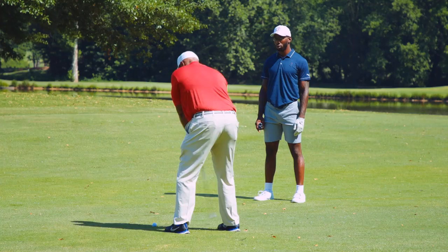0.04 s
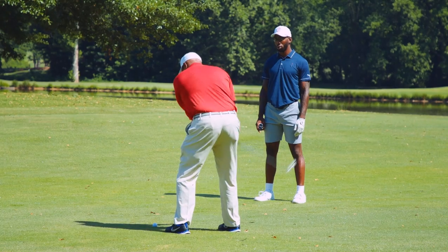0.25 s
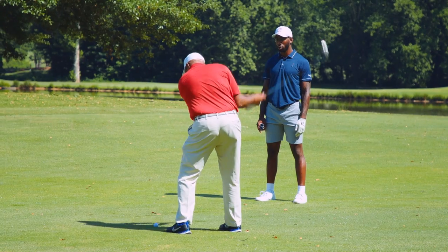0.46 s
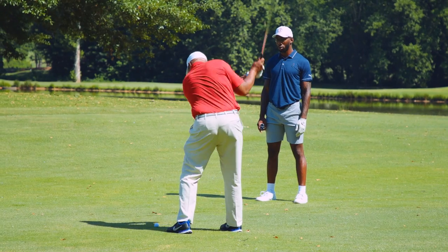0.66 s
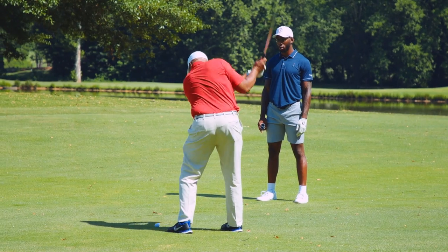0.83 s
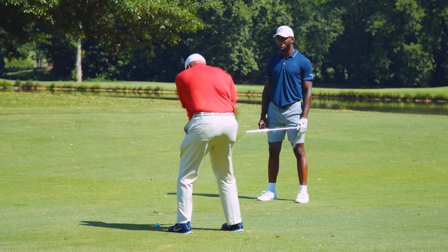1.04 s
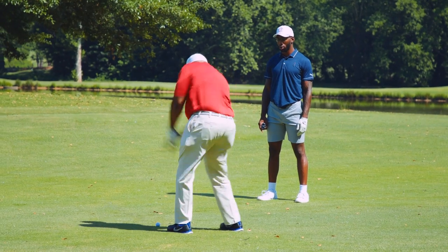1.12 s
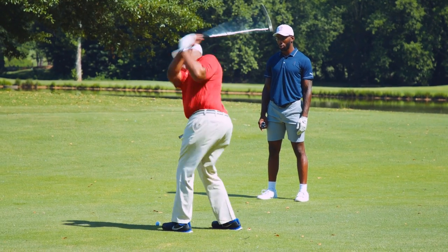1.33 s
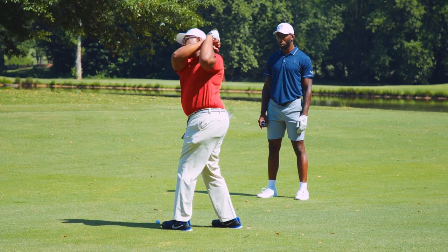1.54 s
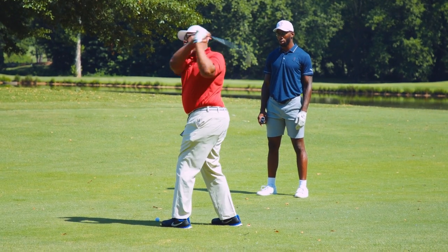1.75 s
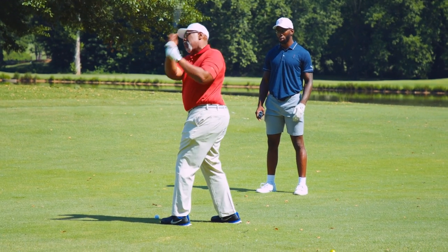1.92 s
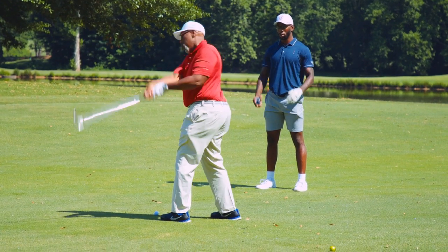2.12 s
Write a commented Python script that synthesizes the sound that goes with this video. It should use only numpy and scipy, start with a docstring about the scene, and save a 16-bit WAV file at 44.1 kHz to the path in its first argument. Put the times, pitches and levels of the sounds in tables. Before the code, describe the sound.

A golfer's swing on a quiet fairway, heard through a small microphone on the shirt: faint air and thin bird whistles, then a sudden cloth swish with heavy thumps, ending in crisp crackles and ticks.

```python
"""A quiet fairway: a golfer wearing a small microphone on his shirt swings a club. Over a soft hiss of shaped
noise glide thin whistles (birds, at a guess) and one lower squeak of the cloth, breathy sines with echoes.
The cloth drags over the capsule: noise and uneven clicks, filtered into bands, give rumble, a grainy swish
and a crisp crackle as the arms come down again. Dry ticks are short noisy snaps; jolts are brief low swings,
two of them with a low knock."""
import sys
import numpy as np
from scipy import signal
from scipy.fft import rfft, irfft
from scipy.io import wavfile
from scipy.ndimage import uniform_filter1d

SR = 44100
rng = np.random.default_rng(int(sys.argv[2]) if len(sys.argv) > 2 else 0)


def master(y):
    """Save y as 16-bit WAV."""
    cut = np.clip(np.atleast_2d(y).T, -1, 1)
    pcm = np.round(cut * 32767)  # scale
    wavfile.write(sys.argv[1], SR, pcm.astype(np.int16))


def linear_from_db(decibels):
    """Turn decibels (scalar or array-like) into linear amplitude factors; 0 gives 1."""
    return 10 ** (np.asarray(decibels, float) / 20)


N = 96314  # samples, about 2.2 s


def colour(x, points):
    """Shape the spectrum of x by (pitch_hz, level_db) points, straight over log frequency; rms 1."""
    hz, db = np.array(points, float).T
    bins_hz = np.fft.rfftfreq(N, 1 / SR) + 1  # the extra 1 Hz avoids log(0)
    gain_db = np.interp(np.log(bins_hz), np.log(hz), db, -120, -120)
    y = irfft(rfft(x) * linear_from_db(gain_db), N)
    return y / np.sqrt(np.mean(y ** 2))


def walk(rate_hz):
    """Random levels held for 1 / rate_hz seconds and slewed twice; spread near 1."""
    hold = int(SR / rate_hz)
    steps = np.repeat(rng.standard_normal(N // hold + 1), hold)
    smooth = uniform_filter1d(uniform_filter1d(steps, hold), hold)
    return 1.09 * smooth[:N]


def grains(per_s, spread_db, hiss_db):
    """Fibres slip past each other: signed clicks of very uneven size over a fine hiss."""
    hit = rng.random(N) < per_s / SR
    size = linear_from_db(spread_db * np.minimum(rng.exponential(size=N), 5))
    clicks = hit * np.sign(rng.standard_normal(N)) * size
    clicks /= np.sqrt(np.mean(clicks ** 2))
    return clicks + linear_from_db(hiss_db) * rng.standard_normal(N)  # hiss_db is relative to the clicks


def curve_gain(table, column):
    """Gain over time from one dB column, with time_s in column 0."""
    c = np.array(table, float)
    return linear_from_db(np.interp(np.arange(N) / SR, c[:, 0], c[:, column]))


def add(out, start_s, x):
    """Mix x into out from start_s on."""
    i = int(start_s * SR)
    out[i:i + len(x)] += x[:N - i]


# Spectrum of the open air: pitch_hz, level_db (per Hz, relative)
AIR_SPECTRUM = [(15, -21), (30, -6), (55, 4.5), (100, 1.5), (160, -2), (250, -8), (500, -9.5), (800, -15),
                (1300, -23.5), (2200, -24), (4000, -21.5), (6000, -28.5), (8000, -42.5), (12700, -53),
                (13300, -70)]


def air():
    """Distant outdoor hiss and hum: shaped noise whose level drifts slowly around -58.5 dB."""
    level_db = -58.5 + 1.4 * walk(4.9)
    return linear_from_db(level_db) * colour(rng.standard_normal(N), AIR_SPECTRUM)


# Spectra of the capsule's rumble and of the low rub: pitch_hz, level_db (per Hz, relative)
RUMBLE_SPECTRUM = [(15, -15.5), (30, -2), (50, 5), (80, -1), (140, -6.5), (200, -14.5), (300, -34.5)]
RUB_SPECTRUM = [(120, -6.5), (200, 0), (300, -1), (500, -5), (800, -10.5), (1200, -29.5)]
# Capsule shaken by the cloth, levels before flutter: time_s, rumble_db, rub_db
SHAKE_LEVELS = [(0, -72, -73), (.25, -59.5, -72), (.33, -54.5, -76), (.42, -56, -67), (.7, -56, -72),
                (.85, -56.5, -67), (1.0, -52.5, -72), (1.11, -51.5, -70), (1.14, -35.5, -58),
                (1.205, -30.5, -37), (1.26, -26.5, -44), (1.31, -26.5, -31.5), (1.35, -19.5, -31.5),
                (1.375, -18, -43), (1.41, -19, -43), (1.44, -33, -35.5), (1.47, -34.5, -37.5),
                (1.5, -28.5, -43), (1.6, -36.5, -41), (1.66, -46, -52), (1.75, -44, -51), (1.84, -41, -47),
                (1.86, -38.5, -39), (1.93, -39.5, -41.5), (1.97, -46.5, -50.5), (2.18, -47, -51.5)]


def shaken_capsule(catch):
    """The cloth shakes the capsule: low noise for the rumble, sparse grains for the rub above it."""
    rumble = colour(rng.standard_normal(N), RUMBLE_SPECTRUM) * linear_from_db(0.94 * walk(25.16))
    rub = colour(grains(500, 2.1, hiss_db=6.0), RUB_SPECTRUM) * linear_from_db(1.6 * catch + 1.6 * walk(29.98))
    return curve_gain(SHAKE_LEVELS, 1) * rumble + curve_gain(SHAKE_LEVELS, 2) * rub


# Spectra of the swish, its upper part and the crisp crackle: pitch_hz, level_db (per Hz, relative)
SWISH_SPECTRUM = [(500, 2), (800, 3), (1500, 2.5), (3000, -0.5), (5000, -7), (6500, -28)]
UPPER_SPECTRUM = [(3800, -11.5), (5000, -3), (6500, 0), (8000, -11), (9500, -20.5), (11000, -27),
                  (13000, -40)]
CRISP_SPECTRUM = [(7000, 4.5), (9000, 4), (12000, 2), (15500, -4.5), (17000, -39.5)]
# Cloth sliding, levels before flutter: time_s, swish_db, upper_swish_db, crisp_crackle_db
SLIDE_LEVELS = [(0, -74, -83, -100), (.09, -92, -84, -100), (.3, -70, -78, -100), (.44, -70.5, -75.5, -100),
                (.47, -66, -70, -96), (.56, -68, -74, -99), (.64, -71, -71.5, -94), (.675, -68, -68, -92),
                (.72, -71, -77, -96), (.9, -73.5, -78.5, -100), (1.08, -67.5, -76.5, -96),
                (1.13, -63.5, -70.5, -100), (1.18, -51.5, -60.5, -100), (1.23, -48.5, -59.5, -99),
                (1.265, -44, -54.5, -97), (1.3, -44.5, -52, -99), (1.318, -35, -44.5, -93.5),
                (1.338, -43.5, -53.5, -97), (1.355, -37.5, -52, -95.5), (1.378, -42, -50, -92),
                (1.408, -39.5, -51.5, -90), (1.45, -40.5, -53.5, -81), (1.51, -45.5, -54, -79),
                (1.57, -44.5, -69, -73.5), (1.6, -41, -69, -68.5), (1.66, -57, -79, -79),
                (1.69, -52, -72, -73), (1.8, -53.5, -73.5, -70), (1.91, -47.5, -64, -63.5),
                (1.96, -51.5, -62.5, -63), (2.0, -52.5, -64.5, -65.5), (2.06, -56, -64.5, -66.5),
                (2.18, -57.5, -67, -70.5)]


def sliding_cloth(catch):
    """Dense fibre slips feed both swish bands; a sparser set of clicks makes the crackle."""
    fibres = grains(6000, 3.75, hiss_db=-1.5)
    swish = colour(fibres, SWISH_SPECTRUM) * linear_from_db(0.69 * catch + 0.53 * walk(59.3))
    upper = colour(fibres, UPPER_SPECTRUM) * linear_from_db(1.0 * catch + 0.71 * walk(59.6))
    crisp = colour(grains(440, 3.0, hiss_db=6.5), CRISP_SPECTRUM) * linear_from_db(0.8 * catch)
    out = curve_gain(SLIDE_LEVELS, 1) * swish
    out += curve_gain(SLIDE_LEVELS, 2) * upper
    return out + curve_gain(SLIDE_LEVELS, 3) * crisp


def cloth():
    """The dragging shirt: catches in the weave flutter every band above the rumble together."""
    catch = walk(45.07)
    return shaken_capsule(catch) + sliding_cloth(catch)


# Thin whistles (birds, at a guess) and one lower squeak of the cloth at 1.41 s:
# start_s, length_s, first_pitch_hz, last_pitch_hz, level_db (sine peak), breathiness (0-1)
WHISTLES_AND_SQUEAK = [(.012, .011, 2800, 3600, -64.5, .3), (.031, .011, 2850, 3800, -65, .3),
                       (.05, .01, 2850, 3500, -65.5, .3), (.082, .1, 4600, 3780, -69.5, .55),
                       (.105, .075, 3880, 3780, -74, .6), (.18, .075, 3770, 3680, -68.5, .4),
                       (.29, .31, 3740, 3640, -72.5, .6), (.587, .028, 2700, 2800, -68, .5),
                       (.636, .028, 3230, 2950, -65, .55), (.652, .028, 2560, 2400, -67.5, .55),
                       (.742, .045, 2280, 2340, -71.5, .3), (.795, .08, 2340, 2310, -71.5, .45),
                       (1.088, .082, 3500, 2960, -56.5, .15), (1.112, .06, 4020, 3800, -60, .2),
                       (1.172, .034, 3780, 3660, -56.5, .2), (1.18, .034, 3400, 2650, -58, .3),
                       (1.212, .034, 3660, 3600, -55.5, .3), (1.253, .05, 3570, 3480, -53, .4),
                       (1.407, .013, 1250, 1520, -39, .6), (1.418, .016, 1560, 1260, -41, .6),
                       (1.56, .04, 2380, 2200, -55, .4), (1.78, .022, 2950, 2670, -54, .5),
                       (1.805, .029, 2550, 2450, -57, .5), (2.07, .048, 6350, 5460, -61.5, .2)]


def whistles_and_squeak():
    """Slightly unsteady gliding sines; breath breaks them up into a narrow band of noise."""
    out, waver = np.zeros(N), walk(250)
    breath = walk(400) + 1j * walk(400)
    for start_s, length_s, first_hz, last_hz, level_db, breathy in WHISTLES_AND_SQUEAK:
        u = np.linspace(0, 1, int(length_s * SR))
        i = int(start_s * SR)
        span = slice(i, i + len(u))
        hz = (first_hz + (last_hz - first_hz) * u) * (1 + 0.004 * waver[span])
        carrier = np.exp(2j * np.pi * np.cumsum(hz) / SR)
        tone = (np.sqrt(1 - breathy ** 2) + breathy * breath[span]) * carrier
        swell = np.abs(np.sin(np.pi * u)) ** 0.31
        add(out, start_s, linear_from_db(level_db) * swell * tone.imag)
    return out


def echoes(tones):
    """Scattered echoes roughen and prolong the whistles and the cloth squeak."""
    t60_s, echo_db = 0.22, -8
    t = np.arange(SR // 3) / SR
    tail = rng.standard_normal(len(t)) * linear_from_db(-60 * t / t60_s)
    tail /= np.sqrt(np.sum(tail ** 2))
    return tones + linear_from_db(echo_db) * signal.fftconvolve(tones, tail)[:N]


# Dry ticks, and two low knocks that go with the jolts at 1.30 and 1.35 s:
# start_s, level_db (peak), centre_hz, width_hz (band at half height), ring_ms (tail down 17 dB)
TICKS_AND_KNOCKS = [(0.68, -45.5, 6340, 8000, 2.8), (1.2198, -33.5, 7070, 3500, 2.2),
                    (1.22, -30.5, 3200, 2600, 1.8), (1.247, -32.5, 5000, 6000, 1.3),
                    (1.287, -32, 1890, 2520, 3.2), (1.297, -25.5, 500, 1290, 1.8),
                    (1.353, -21, 500, 1200, 2.7), (1.568, -29.5, 3100, 4470, 4.8),
                    (1.595, -41, 4000, 8000, 2.5), (1.645, -54, 10100, 8040, 1.8),
                    (1.974, -47, 11000, 9000, 1.1), (1.981, -39, 10000, 12100, 4.0),
                    (1.9816, -44, 9000, 12000, 3.5), (1.985, -35, 9800, 12200, 3.2),
                    (1.99, -31.5, 6500, 13900, 2), (2.011, -51, 11000, 9000, 1.3),
                    (2.0128, -32.5, 2000, 3500, 0.99), (2.024, -40, 6000, 12000, 1.5),
                    (2.035, -30.5, 1750, 3520, 0.78), (2.035, -42, 8040, 12000, 1.2),
                    (2.045, -46, 10000, 9100, 1.2), (2.054, -36, 5500, 9950, 2.1),
                    (2.07, -39, 3600, 3500, 1.3), (2.092, -52, 9000, 9900, 1.2),
                    (2.118, -40, 9450, 11000, 1.8), (2.14, -40.5, 1680, 1500, 3.8)]


def ticks_and_knocks():
    """A snap with a short noisy tail, confined to one broad band each."""
    size, lead = 1024, 128  # samples; the lead leaves room for the filter to ring before the snap
    out, i = np.zeros(N), np.arange(size) - lead
    bins_hz = np.fft.rfftfreq(size, 1 / SR)
    for start_s, level_db, centre_hz, width_hz, ring_ms in TICKS_AND_KNOCKS:
        decay = np.exp(-np.abs(i) / SR / (ring_ms / 2000))
        tail = (i >= 0) * 0.5 * rng.standard_normal(size) * decay
        burst = tail + 1.5 * (i == 0)
        band = np.exp(-((bins_hz - centre_hz) / (0.6 * width_hz)) ** 2)
        y = irfft(rfft(burst) * band)
        add(out, start_s - lead / SR, linear_from_db(level_db) * y / np.abs(y).max())
    return out


# Jolts of the capsule: peak_s, level_db (peak), pitch_hz, cycles (span where the swing exceeds 0.29 of peak)
CAPSULE_JOLTS = [(1.256, -17, 90, 1.16), (1.299, -26, 250, 1.1), (1.325, -18.5, 303, 2.03),
                 (1.344, -14, 60, 0.87), (1.354, -6.5, 145.6, 1.29), (1.366, -12.5, 54, 0.71),
                 (1.388, -25, 223, 3.4), (1.399, -9, 77, 1.42), (1.471, -16.5, 141, 0.89),
                 (1.858, -32, 146, 1.24), (1.48, -25.5, 226, 1.27), (1.605, -33.5, 263, 2.8),
                 (1.906, -34, 115, 2.8)]


def jolts():
    """Each tug swings the capsule briefly: a cosine under a bell centred on its peak."""
    out = np.zeros(N)
    for peak_s, level_db, hz, cycles in CAPSULE_JOLTS:
        reach_s = 1.2 * cycles / hz
        t = np.arange(-reach_s, reach_s, 1 / SR)
        bell = np.exp(-(2.23 * t * hz / cycles) ** 2)
        add(out, peak_s + t[0], linear_from_db(level_db) * bell * np.cos(2 * np.pi * hz * t))
    return out


def scene():
    """All sources at the one capsule, as a single channel."""
    mix = air() + cloth() + echoes(whistles_and_squeak()) + ticks_and_knocks() + jolts()
    return mix[None]


def top_cut(x):
    """Nothing passes above the cut-off."""
    return signal.sosfilt(signal.butter(12, 15860, fs=SR, output="sos"), x)


def record(dry):
    """Pass on the finished mix with no other treatment."""
    return top_cut(dry)


dry = scene()
out = record(dry)
master(out)
```